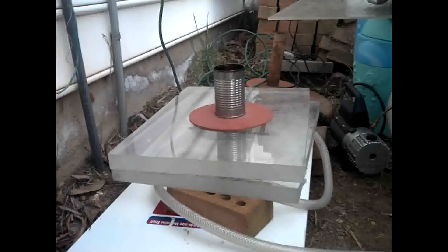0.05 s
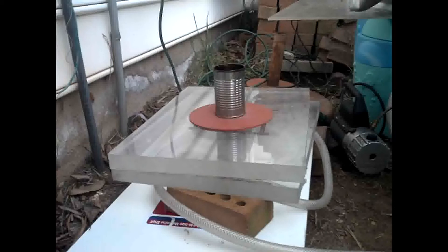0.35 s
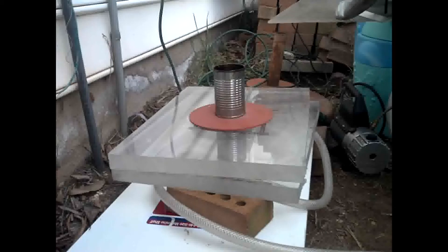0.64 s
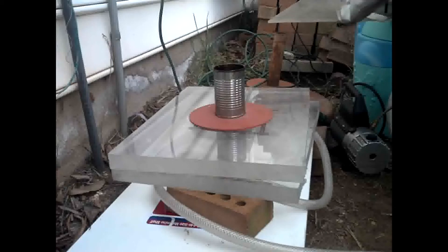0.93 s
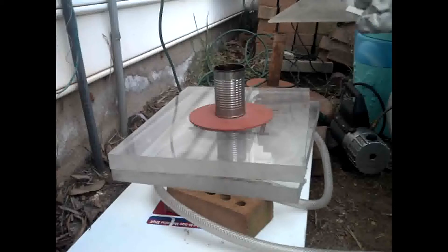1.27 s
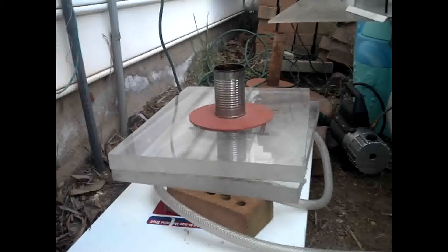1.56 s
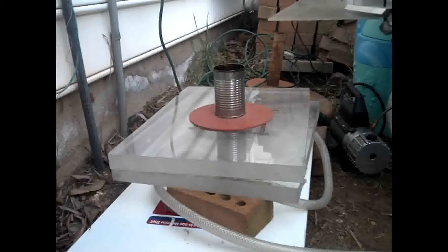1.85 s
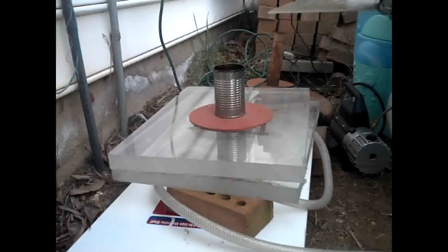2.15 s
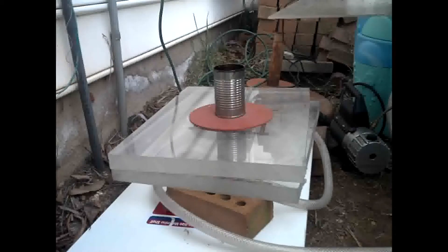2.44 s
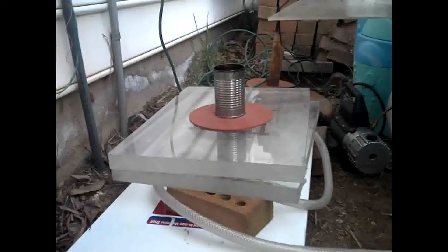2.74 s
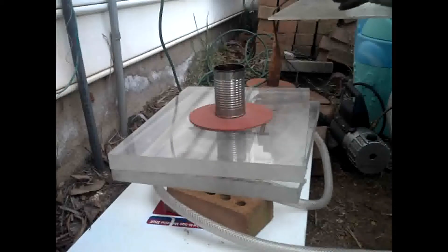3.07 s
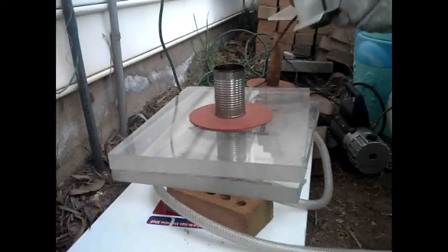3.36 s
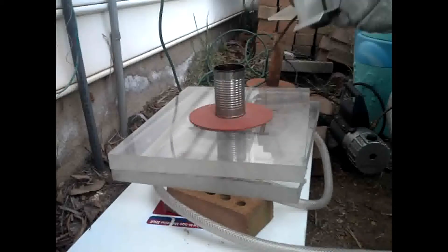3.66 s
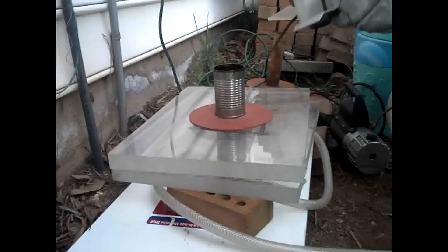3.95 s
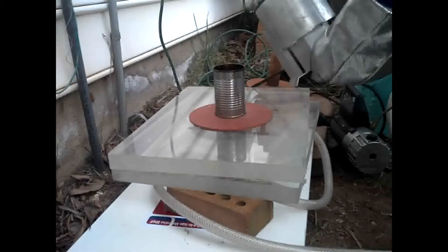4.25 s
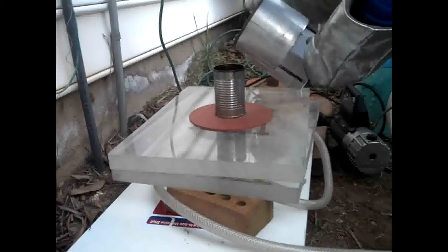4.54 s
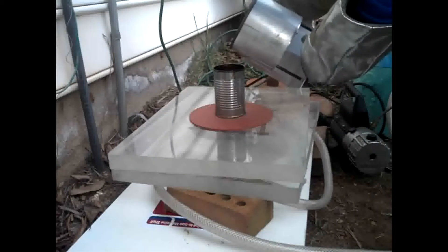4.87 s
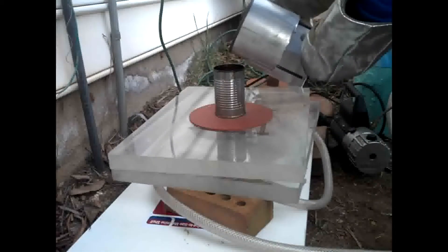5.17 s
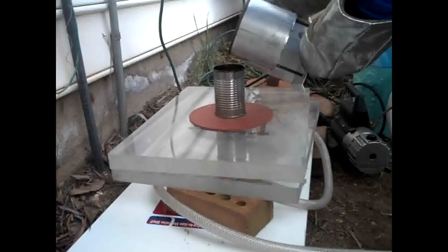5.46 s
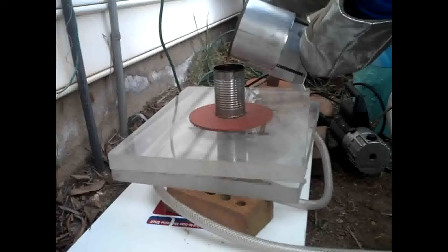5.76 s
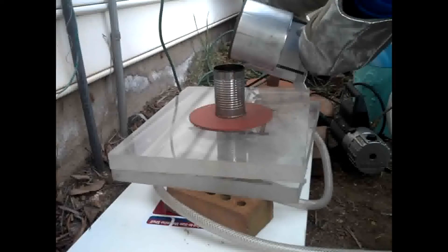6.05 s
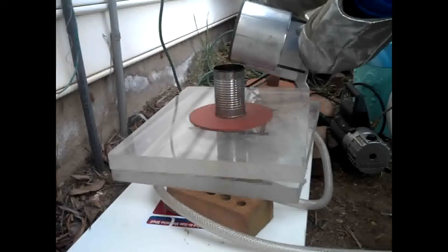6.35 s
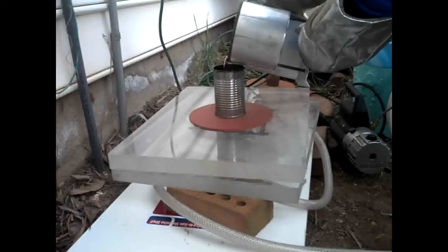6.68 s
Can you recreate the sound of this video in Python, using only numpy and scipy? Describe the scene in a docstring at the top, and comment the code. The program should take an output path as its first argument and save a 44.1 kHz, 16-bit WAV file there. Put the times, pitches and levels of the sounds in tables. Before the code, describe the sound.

A small vacuum pump hums, rattles and gurgles outdoors amid light knocks; after one sharp click the sound drops and slowly returns.

```python
"""In a backyard, a rotary vacuum pump hums: two exhaust puffs a turn, vanes rattling the casing,
oil gurgling in the outlet and glugging in the sump. Someone handling gear beside it makes a few
knocks, clinks and a squeak, then moves in close, which changes the colour of the hum.
At one sharp click the whole sound lurches up for an instant, drops, and slowly creeps back."""
import sys
import numpy as np
from scipy import signal
from scipy.fft import rfft, irfft
from scipy.io import wavfile
from scipy.ndimage import uniform_filter1d

SR = 44100
rng = np.random.default_rng(int(sys.argv[2]) if len(sys.argv) > 2 else 0)


def dump_mix(stems):
    """Bounce the given channels to the path in sys.argv[1] as a 16-bit WAV at rate SR."""
    frames = np.atleast_2d(stems).T  # one column per channel
    limited = np.clip(frames, -1, 1)  # hard clip at full scale
    pcm = np.round(limited * 32767).astype(np.int16)
    wavfile.write(sys.argv[1], SR, pcm)


N = 295955
T = np.arange(N) / SR
HZ = np.fft.rfftfreq(N, 1 / SR)

# body of the hum: multiple of the shaft speed, level/dB with the path clear, level/dB with someone close
EXHAUST_TONES = [(2, -38.6, -39.2), (4, -49.4, -47.5), (5, -47.3, -51.1), (6, -34.3, -29.9),
                 (8, -54.0, -49.0), (10, -55.5, -54.0), (12, -42.5, -45.2), (14, -39.5, -49.9),
                 (16, -39.1, -41.5), (18, -38.0, -43.0), (20, -39.0, -44.5), (22, -44.9, -43.0),
                 (24, -48.4, -51.2), (26, -55.9, -57.8), (28, -38.8, -48.1), (30, -54.3, -61.8),
                 (32, -55.8, -53.4), (34, -61.9, -68.1), (36, -62.6, -60.6), (38, -58.7, -54.7)]
# breath of the puffs: f/Hz, density/(dB per Hz)
EXHAUST_AIR = [(400, -103.5), (520, -95.5), (590, -69.5), (680, -73.5), (850, -64.5), (1050, -70.5),
               (1270, -67), (1460, -78), (1800, -77.5), (2120, -74), (2600, -94), (4000, -110)]
def exhaust(turns, close, trim_db=0.08, waver_db=2.0, clear_rad=0.38, blur_rad=0.8, air_close_db=-1.0):
    """Two puffs a turn: a stack of tones over pulsing air noise, crisp until someone close blurs them."""
    tones = np.zeros(N)
    scatter_rad = clear_rad + blur_rad * close ** 2
    for order, clear_db, near_db in EXHAUST_TONES:
        stray = min(order / 16, 2)  # reflections from the yard disturb the short waves most
        level_db = clear_db + close * (near_db - clear_db)
        level_db += waver_db * min(stray, 1) * wander(rate_hz=2.5)
        phase = 2 * np.pi * order * turns + stray * scatter_rad * rng.standard_normal()
        tones += np.sqrt(2) * amp(level_db + trim_db) * np.cos(phase)
    puff_depth = 0.15 * (1 - 0.79 * close)
    puffs = (1 + puff_depth * np.cos(2 * np.pi * 2 * turns)) * rng.standard_normal(N)
    return tones + colour(puffs, EXHAUST_AIR) * amp(air_close_db * close)


def outlet(x, lag_s=0.00444, low_hz=650, high_hz=1400):
    """The outlet passes the higher tones later, so each puff is a tiny upward sweep."""
    delay_s = lag_s * np.clip((HZ - low_hz) / (high_hz - low_hz), 0, 1)
    phase_lag = 2 * np.pi * np.cumsum(delay_s) * SR / N
    return irfft(rfft(x) * np.exp(-1j * phase_lag), N)


# the casing's lead tones: multiple of the shaft speed, relative level/dB with the path clear, and close
CASING_TONES = [(48, -61, -68), (49, -62.5, -65), (50, -64, -61), (52, -76, -76), (53, -72, -72),
                (54, -50.2, -52.9), (56, -48.8, -53.8), (58, -50.5, -49.3), (59, -59.1, -57.2),
                (60, -53.7, -52.6), (64, -55.6, -60.8), (66, -51.8, -57.2), (68, -54.5, -53.6),
                (69, -56.2, -63.7), (70, -47.4, -50.5), (71, -54.8, -57.9), (72, -56.1, -56.4),
                (74, -60.8, -57.2), (76, -51.8, -66), (78, -53.3, -53.7), (80, -52.1, -51.8),
                (82, -54.6, -55.2), (83, -56.6, -62.1), (84, -52.6, -51.4), (86, -62.2, -53.8),
                (94, -56.3, -59.5), (96, -57.4, -59.0), (99, -62.2, -57.3), (100, -57.2, -58.3),
                (104, -54.3, -58.5), (106, -50.4, -54.2), (107, -66, -55.8), (108, -51.6, -50.1),
                (109, -53.6, -62.6), (110, -56.5, -55.6), (112, -54.9, -57.5), (114, -57.3, -54.6),
                (120, -64.9, -55.9)]
# hiss of the rattle: f/Hz, relative density/(dB per Hz)
RATTLE_HISS = [(1500, -94), (2800, -81.5), (3020, -88), (3150, -78.5), (3800, -74), (4700, -80),
               (5600, -78), (6300, -76), (7300, -76), (8200, -82.5), (8800, -81.5), (9200, -79.5),
               (9600, -97.5)]
# bands of the casing: from f/Hz, to f/Hz, lag/s, phase scatter/rad with the path clear, and close
CASING_BANDS = [(1700, 3000, 0.0128, 1.5, 1.5), (3000, 4000, 0.0146, 1.0, 0.6),
                (4000, 5300, 0.0115, 1.0, 0.4), (5300, 9400, 0.004, 1.35, 1.25)]
def vanes(turns, close, shaft_hz, tone_db=0.34, waver_db=2.1, slap_db=1.6, hiss_db=0.17, close_db=-0.6):
    """The vanes slap twice a turn; each band of the casing answers after its own lag with buzz and hiss."""
    out = np.zeros(N)
    tones = CASING_TONES + casing_buzz(shaft_hz)
    for low_hz, high_hz, lag_s, clear_rad, near_rad in CASING_BANDS:
        angle = 2 * np.pi * ((turns - lag_s * shaft_hz) % 1)
        scatter_rad = clear_rad + close * (near_rad - clear_rad)
        for order, clear_db, near_db in tones:
            if low_hz <= order * shaft_hz < high_hz:
                level_db = clear_db + close * (near_db - clear_db) + waver_db * wander(rate_hz=2)
                phase = order * angle + scatter_rad * rng.standard_normal()
                out += np.sqrt(2) * amp(level_db + tone_db) * np.cos(phase)
        pulse = np.cos(2 * angle) + 0.5 * np.cos(angle) + 0.5 * np.cos(4 * angle)
        slaps = pulse * np.exp(-scatter_rad ** 2) + 0.35 * np.cos(6 * angle)  # scatter softens the slap
        bursts = amp(slap_db * slaps) * rng.standard_normal(N)
        hiss = colour(bursts, RATTLE_HISS, band=(HZ >= low_hz) & (HZ < high_hz))
        out += hiss * amp(hiss_db + close_db * close)
    return out


def casing_buzz(shaft_hz, lift_db=16, spread_db=2, top_hz=7200, top_db=-5, close_db=-6.0):
    """Weaker vane tones fill in between the lead ones, shaped like the hiss; rows like CASING_TONES."""
    taken = [row[0] for row in EXHAUST_TONES + CASING_TONES]
    orders = np.array([order for order in range(29, 161) if order not in taken])
    hz = orders * shaft_hz
    hiss_hz, hiss_db = np.transpose(RATTLE_HISS)
    level_db = np.interp(np.log(hz), np.log(hiss_hz), hiss_db) + lift_db + top_db * (hz > top_hz)
    level_db += spread_db * rng.standard_normal(len(orders))
    return list(zip(orders, level_db, level_db + close_db))


# featured gurgles in the outlet: t/s, relative level/dB, mid-rise f/Hz, rise/(Hz per s)
OIL_GURGLES = [(.085, -35, 1105, 10970), (.243, -37, 1080, 17760), (.383, -37, 1130, 16960),
               (0.491, -35, 1140, 17140), (.603, -34, 1200, 6040), (.766, -36, 1200, 6050),
               (.844, -35, 1100, 15900), (.972, -33, 1090, 13960), (1.104, -35, 1150, 20930),
               (1.233, -35.1, 1165, 14050), (1.372, -39, 1075, 7930), (1.548, -31.5, 1015, 13770),
               (1.665, -38, 1090, 13900), (1.803, -35, 970, 16940), (1.973, -37.8, 1090, 21900),
               (2.306, -33, 1045, 13130), (2.485, -32, 1075, 14000), (2.559, -40, 985, 13970),
               (2.747, -39, 1020, 14000), (2.845, -35.5, 1060, 14100), (2.966, -37, 1195, 5000),
               (3.109, -34, 1090, 14100), (3.685, -43, 1170, 13950), (3.871, -34, 1105, 5900),
               (4.394, -36.5, 1090, 21900), (4.694, -37.8, 1150, 14170), (4.851, -35, 1090, 11100),
               (5.057, -38, 955, 18020), (5.174, -35, 1075, 8070), (5.299, -37.2, 1060, 22000),
               (5.523, -37, 1120, 11200), (5.956, -40, 1060, 28000), (6.203, -36, 1090, 11040),
               (6.402, -34.5, 1135, 13840), (6.514, -39, 1135, 14040), (6.655, -37, 1090, 10940)]
def gurgles(turns, gain_db=3.1, throb=0.35, roughness=0.28, outlet_band_hz=(780, 1350)):
    """Bubbles rise in pitch as they near the oil's surface, trembling as it churns, shaken by each puff."""
    out = np.zeros(N)
    for s, db, hz, rise_hz_per_s in OIL_GURGLES + faint_bubbles():
        chirp = bubble(hz, rise_hz_per_s, fade_s=0.0155, wobble_hz=65)
        add(out, s - len(chirp) / SR / 2, amp(db + gain_db) * chirp)
    out *= 1 + throb * np.cos(2 * np.pi * 2 * turns)
    out *= 1 + roughness * wander(rate_hz=120)
    return signal.sosfilt(signal.butter(2, outlet_band_hz, "band", fs=SR, output="sos"), out)


def faint_bubbles(every_s=0.128, jitter_s=0.02):
    """Fainter bubbles keep up a loose beat between the featured gurgles; rows like OIL_GURGLES."""
    edges = [0] + [row[0] for row in OIL_GURGLES] + [T[-1]]
    fills = [np.linspace(a, b, round((b - a) / every_s) + 1)[1:-1] for a, b in zip(edges, edges[1:])]
    beats = np.concatenate(fills)
    late, loud, high, steep = rng.standard_normal((len(beats), 4)).T
    level_db = -42 + 1.2 * loud
    hz = 1086 + 80 * high
    rise_hz_per_s = 12000 * np.exp(0.5 * steep)
    return list(zip(beats + jitter_s * late, level_db, hz, rise_hz_per_s))


def bubble(hz, glide_hz_per_s, fade_s, wobble_hz):
    """One bubble rings: a wobbling, gliding tone that swells and fades around its midpoint."""
    t = np.arange(-SR // 20, SR // 20) / SR
    wobble = unit(uniform_filter1d(rng.standard_normal(len(t)), size=90))
    pitch_hz = hz + glide_hz_per_s * t + wobble_hz * wobble
    phase = 2 * np.pi * (np.cumsum(pitch_hz) / SR + rng.random())
    return np.sqrt(2) * np.cos(phase) * np.exp(-(t / fade_s) ** 2)


# knocks on the gear: t/s, thud level/dB, thud f/Hz, clack level/dB, tick level/dB, clack and tick t60/s
GEAR_KNOCKS = [(.285, -43, 328, -29.5, -26, 0.16), (.312, -23, 342, -26, -27.5, 0.128),
               (.346, -38, 332, -29, -27.5, 0.1), (1.602, -50, 340, -45, -27, 0.07),
               (2.158, -47, 340, -18, -32, 0.031), (2.163, -16.5, 208, -23.5, -47, 0.12),
               (2.831, -18.5, 332, -37, -52, 0.061), (3.043, -46, 340, -26.5, -29, 0.078),
               (3.054, -24.5, 310, -35, -53, 0.088), (6.445, -24, 332, -44, -54, 0.079)]
# a knock's midrange clack and bright tick: f/Hz, width/Hz, relative level/dB
CLACK_MODES = [(614, 530, 3.5), (930, 280, 0), (1434, 240, -4), (2050, 700, -8)]
TICK_MODES = [(3300, 1600, 11), (4300, 790, -1.5), (6540, 2000, 10), (9340, 680, -9)]
def knocks(thud_t60_ratio=0.89, thud_rise_s=0.005, crack_rise_s=0.000099):
    """Handled gear knocks: a hard clack and tick over a rounder thud with a softer attack."""
    out, t = np.zeros(N), np.arange(SR // 5) / SR
    for s, thud_db, thud_hz, clack_db, tick_db, t60 in GEAR_KNOCKS:
        thud = amp(thud_db) * np.sqrt(2) * np.sin(2 * np.pi * thud_hz * t)
        thud *= (1 - np.exp(-t / thud_rise_s)) * decay(t, t60 * thud_t60_ratio)
        clack = amp(clack_db) * unit(ring(CLACK_MODES, len(t)))
        tick = amp(tick_db) * unit(ring(TICK_MODES, len(t)))
        crack = (clack + tick) * (1 - np.exp(-t / crack_rise_s)) * decay(t, t60)
        add(out, s, thud + crack)
    return out


CLICK_S = 3.4668
# low tail of the click: f/Hz, width/Hz, relative level/dB
BOOM_MODES = [(111, 58, 11), (313, 190, 7), (800, 470, 2)]
def click(push_db=-13, push_s=0.00063, crack_db=-22, boom_db=-38):
    """One sharp push of pressure with a dry crack, then a short low boom."""
    out, t = np.zeros(N), np.arange(SR // 4) / SR
    push = (1 - t / push_s) * np.exp(-t / push_s)
    crack = unit(ring(CLACK_MODES, len(t))) * decay(t, t60=0.021)
    boom = unit(ring(BOOM_MODES, len(t))) * decay(t, t60=0.5)
    add(out, CLICK_S, amp(push_db) * push + amp(crack_db) * crack + amp(boom_db) * boom)
    return out


# clinks of the gear: t/s, level/dB
GEAR_CLINKS = [(0.2848, -19), (.32, -25)]
# ring of the metal: f/Hz, relative level/dB, t60/s
CLINK_MODES = [(1000, -2.5, 0.13), (1846, -4.5, 0.052), (4160, -11, 0.054)]
def clinks():
    """Metal touches metal and rings briefly."""
    out, t = np.zeros(N), np.arange(SR // 4) / SR
    chime = sum(amp(db) * decay(t, t60) * np.sin(2 * np.pi * hz * t) for hz, db, t60 in CLINK_MODES)
    for s, db in GEAR_CLINKS:
        add(out, s, amp(db) * chime)
    return out


# thin, high resonances of the squeak: f/Hz, width/Hz, level/dB
SQUEAK_MODES = [(4800, 450, -38), (8010, 420, -33.5), (9100, 890, -41.5)]
def squeak(peak_s=1.579, fade_s=0.025):
    """The metal squeaks once, a quick swell of ringing noise."""
    return ring(SQUEAK_MODES, N) * np.exp(-((T - peak_s) / fade_s) ** 2)


# deep glugs in the sump: t/s, level/dB, mid-glide f/Hz, glide/(Hz per s)
SUMP_GLUGS = [(0.19, -33.5, 263, 2200), (0.76, -34, 265, 2200), (0.89, -34.5, 274, 2200),
              (.955, -51, 478, 7000), (1.033, -38, 289, 2200), (1.333, -46, 304, 2200),
              (1.494, -41, 360, -3000), (1.745, -42, 280, 2200), (2.085, -38, 517, -10000),
              (2.655, -40, 316, 2198), (4.655, -41, 442, -6000), (5.09, -32, 270, 2200),
              (6.465, -46, 456, -7000)]
def glugs():
    """Large bubbles low in the oil, each sliding up or down in pitch."""
    out = np.zeros(N)
    for s, db, hz, glide_hz_per_s in SUMP_GLUGS:
        chirp = bubble(hz, glide_hz_per_s, fade_s=0.013, wobble_hz=25)
        add(out, s - len(chirp) / SR / 2, amp(db) * chirp)
    return out


# low bed of oil noise: f/Hz, density/(dB per Hz)
OIL_CHURN = [(40, -92), (80, -95.5), (110, -69.5), (160, -72.5), (220, -66), (300, -70.5), (360, -61.5),
             (440, -75.5), (520, -82.5), (1000, -100)]
def churn(close, swell_db=3.0, close_db=-0.5):
    """Churning oil makes a low rush that swells quickly and unevenly."""
    rush = colour(rng.standard_normal(N), OIL_CHURN)
    return rush * amp(swell_db * wander(rate_hz=20) + close_db * close)


# electrical hum: f/Hz, level/dB
MOTOR_TONES = [(120, -54.5), (714, -53), (719.8, -45.5)]
def motor():
    """The motor's steady electrical tones beat against those of the slightly slower shaft."""
    return sum(amp(db) * np.sqrt(2) * np.cos(2 * np.pi * hz * T) for hz, db in MOTOR_TONES)


def amp(db):
    """Decibels to gain."""
    return 10 ** (db / 20)


def decay(t, t60):
    """A tail that falls 60 dB in t60 seconds."""
    return amp(-60 * t / t60)


def unit(x):
    """Scales to rms 1."""
    return x / np.sqrt(np.mean(x ** 2) + 1e-20)


def curve(rows):
    """Joins (t/s, value) rows by straight lines."""
    return np.interp(T, *np.transpose(rows))


def add(mix, s, sound):
    """Mixes a sound in at time s."""
    part = mix[max(round(s * SR), 0):][:len(sound)]
    part += sound[:len(part)]


def wander(rate_hz):
    """Random drift of rms 1."""
    knots_s = np.arange(0, T[-1] + 1, 1 / rate_hz / 2)
    return unit(np.interp(T, knots_s, rng.standard_normal(len(knots_s))))


def colour(x, spectrum, band=1):
    """Gives white noise a spectrum in dB per Hz, optionally within one band only."""
    hz, db = np.transpose(spectrum)
    gain = band * amp(np.interp(np.log(HZ + 1), np.log(hz), db))
    return irfft(rfft(unit(x)) * gain, N) * np.sqrt(SR / 2)


def ring(modes, size):
    """Noise ringing in a few resonances, each at its own rms level."""
    out = np.zeros(size)
    for hz, width, db in modes:
        band = signal.butter(2, [max(hz - width / 2, 20), hz + width / 2], "band", fs=SR, output="sos")
        out += amp(db) * unit(signal.sosfilt(band, rng.standard_normal(2 * size))[size:])
    return out


# the shaft creeps faster, with one slight sag: t/s, speed/(turns per s)
SHAFT_SPEED = [(0, 58.335), (1.05, 58.405), (1.4, 58.34), (2.4, 58.45), (6.7, 58.525)]
# the person's moves beside the pump: t/s, closeness/(0-1)
CLOSENESS = [(0, 0.17), (1.3, 0), (2.7, 0.2), (3.3, 0.35), (3.7, 1)]
def scene():
    """The pump, the handling noises and the click, in one channel."""
    turns = np.cumsum(curve(SHAFT_SPEED)) / SR
    close = curve(CLOSENESS)
    pump = outlet(exhaust(turns, close) + gurgles(turns))
    pump += vanes(turns, close, shaft_hz=SHAFT_SPEED[0][1])
    bed = motor() + churn(close) + glugs()
    gear = knocks() + squeak() + clinks()
    return (pump + bed + gear + click())[None]


def lurch(x, lead_s=0.0011, hold_s=0.0473, jump_db=6, hum_db=7.8, drop_db=-13, recover_db_per_s=3.5):
    """The whole sound jumps up at the click, the low hum most; then it falls far down and creeps back."""
    since = T - (CLICK_S - lead_s)
    held = (since >= 0) & (since < hold_s)
    jump = uniform_filter1d(held.astype(float), size=40)
    dip_db = np.minimum(drop_db + recover_db_per_s * (since - hold_s), 0) * (since >= hold_s)
    level_db = jump_db * jump + uniform_filter1d(dip_db, size=40)
    hum_band = np.exp(-((HZ - 288) / 180) ** 2)
    hum = irfft(rfft(x) * hum_band, N)
    return (x + (amp(hum_db * jump) - 1) * hum) * amp(level_db)


# narrow holes in the treble: f/Hz, width/Hz
DEAD_BANDS = [(2545, 446), (5220, 307), (7790, 300)]
def record(dry, notch_db=-32, bass_hz=75, top_hz=9600):
    """The level lurches; deep bass, three narrow treble bands and the top are cut away."""
    dead = sum(np.exp(-(2 * (HZ - hz) / width) ** 4) for hz, width in DEAD_BANDS)
    notched = irfft(rfft(lurch(dry)) * amp(notch_db * dead), N)
    thinned = signal.sosfilt(signal.butter(2, bass_hz, "high", fs=SR, output="sos"), notched)
    top_cut = signal.firwin(801, top_hz, window=("kaiser", 8), fs=SR)
    return signal.oaconvolve(thinned, top_cut[None], "same")


dry = scene()
out = record(dry)
dump_mix(out)
```